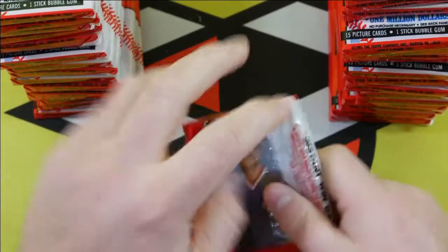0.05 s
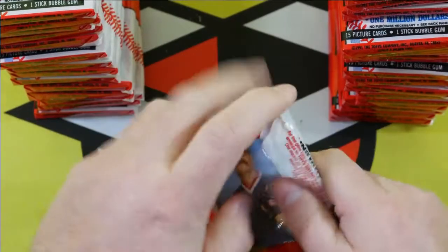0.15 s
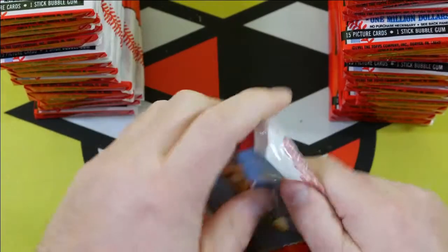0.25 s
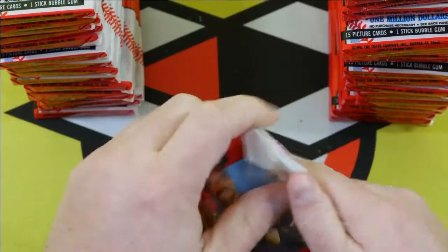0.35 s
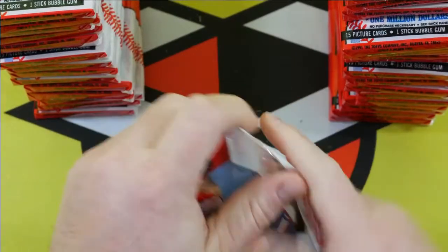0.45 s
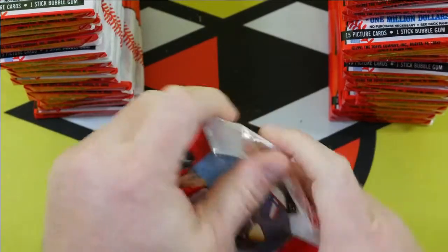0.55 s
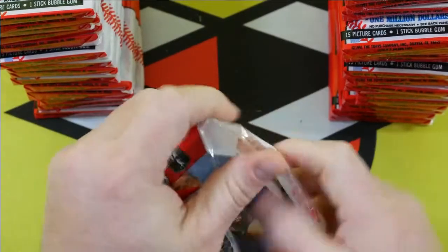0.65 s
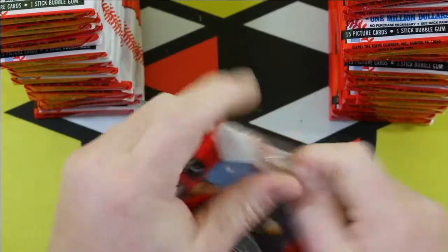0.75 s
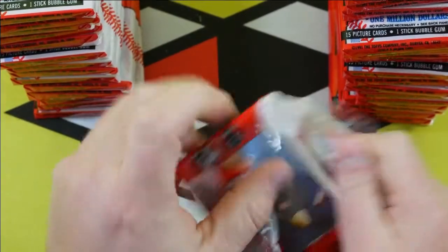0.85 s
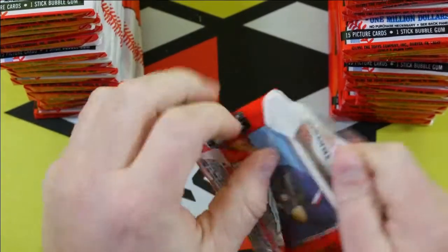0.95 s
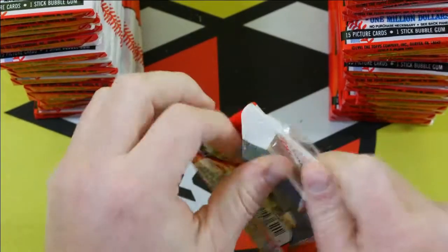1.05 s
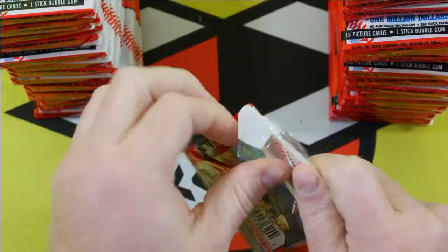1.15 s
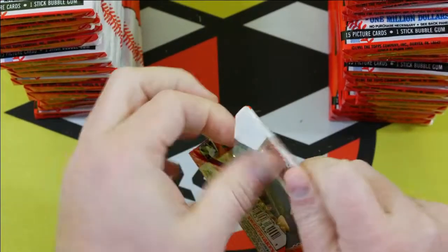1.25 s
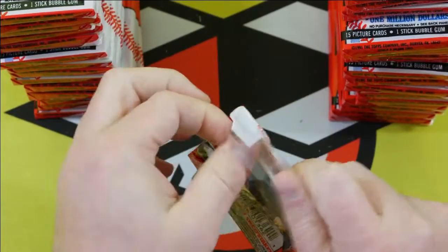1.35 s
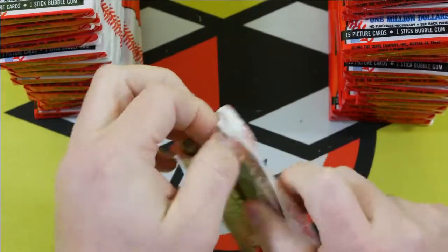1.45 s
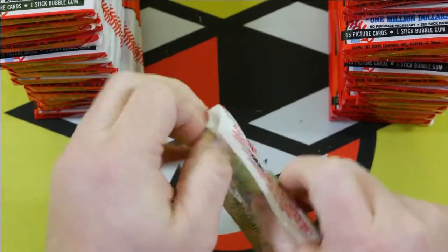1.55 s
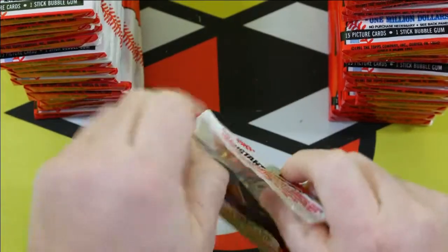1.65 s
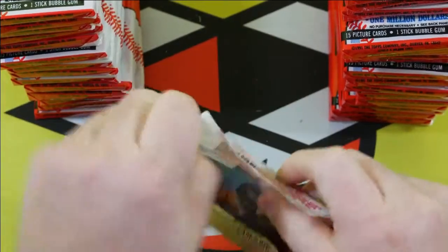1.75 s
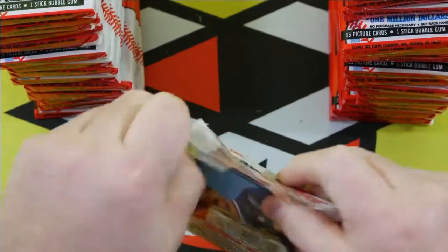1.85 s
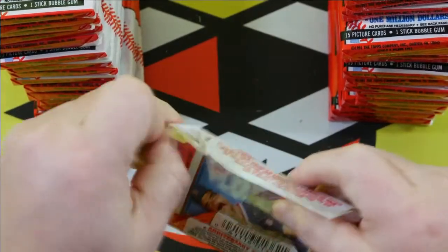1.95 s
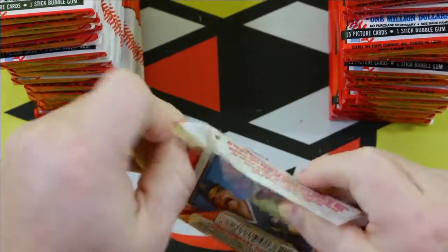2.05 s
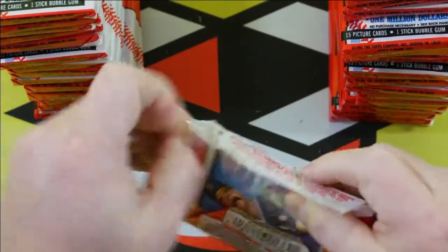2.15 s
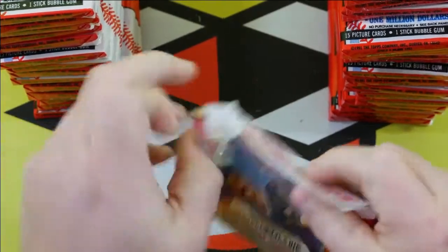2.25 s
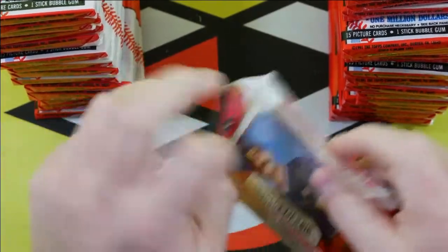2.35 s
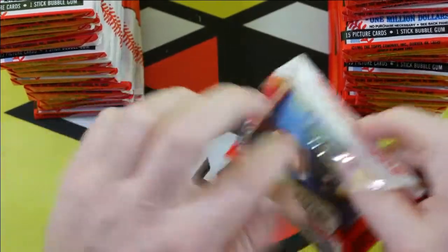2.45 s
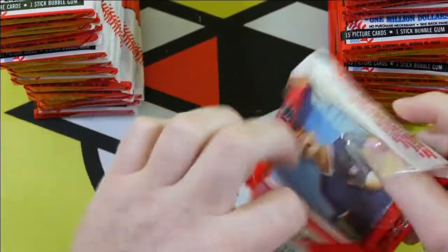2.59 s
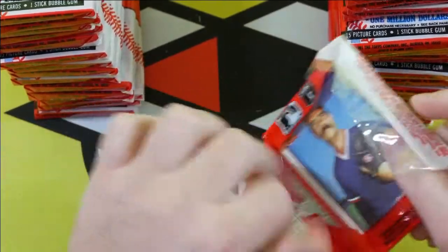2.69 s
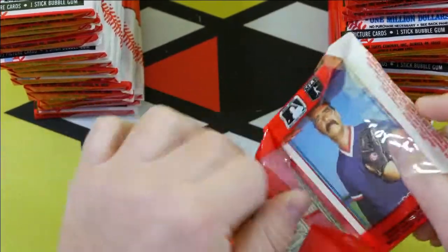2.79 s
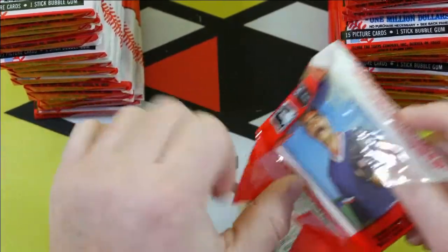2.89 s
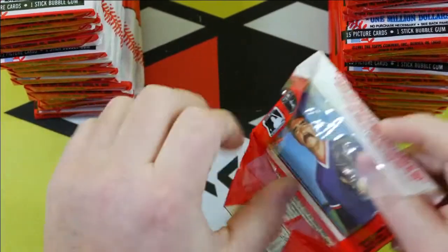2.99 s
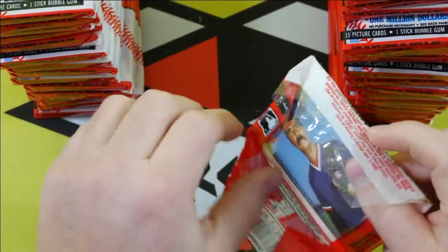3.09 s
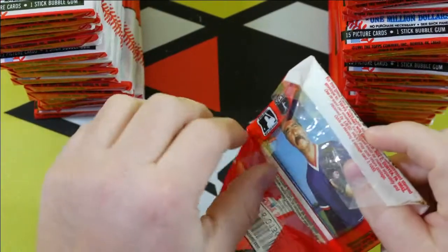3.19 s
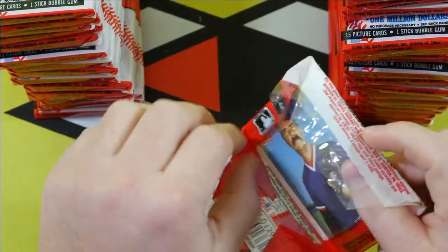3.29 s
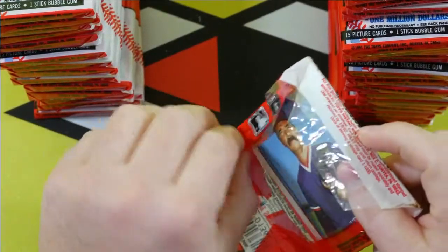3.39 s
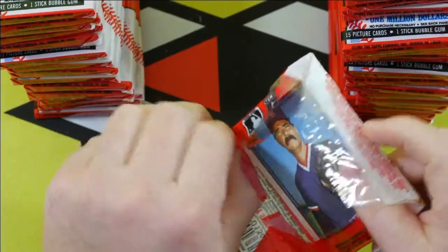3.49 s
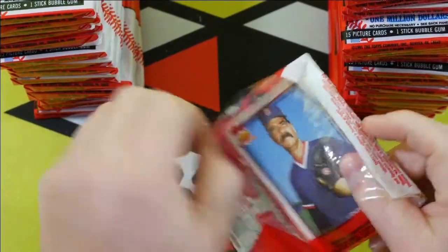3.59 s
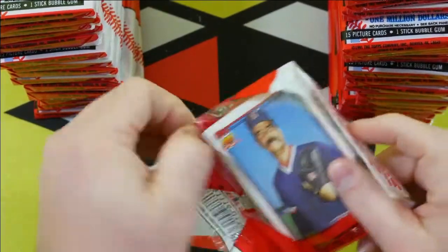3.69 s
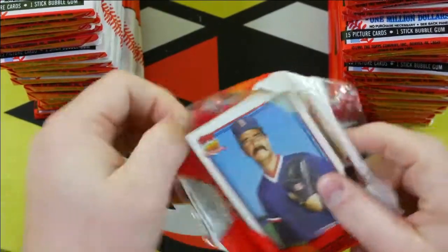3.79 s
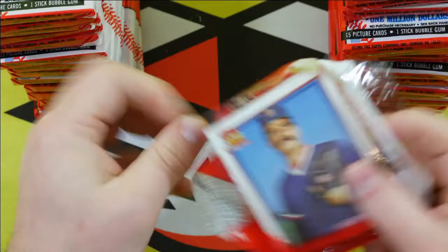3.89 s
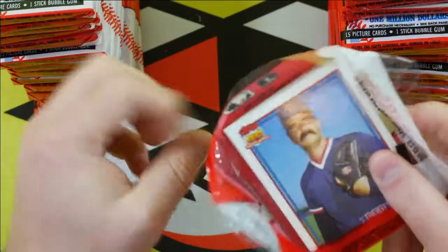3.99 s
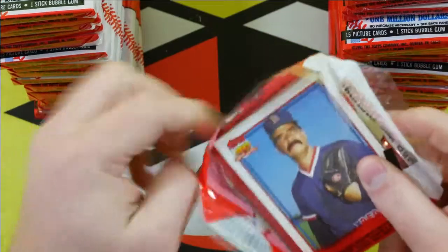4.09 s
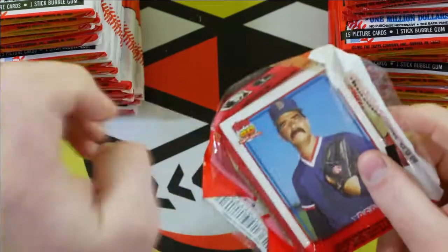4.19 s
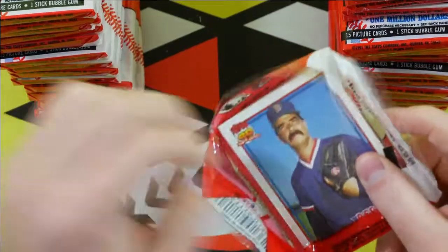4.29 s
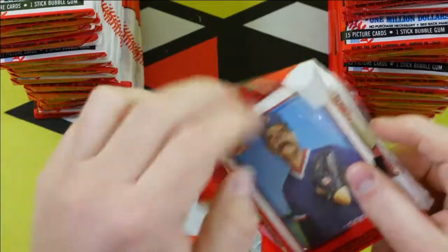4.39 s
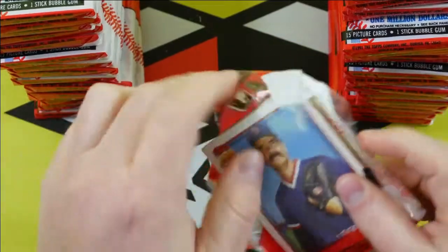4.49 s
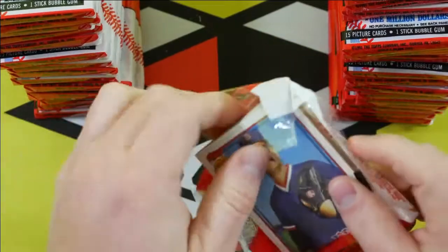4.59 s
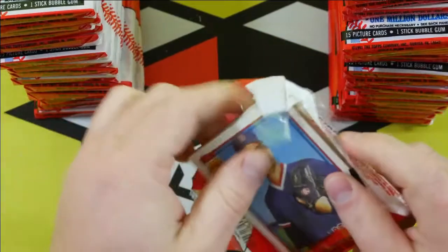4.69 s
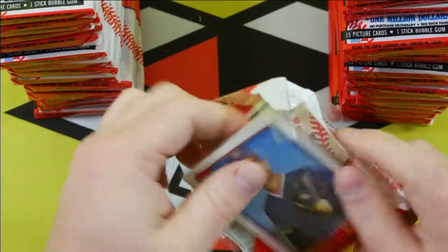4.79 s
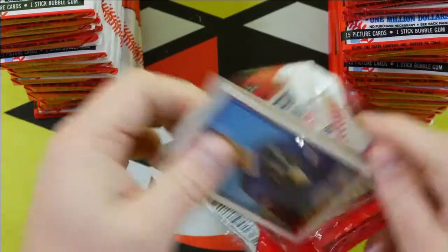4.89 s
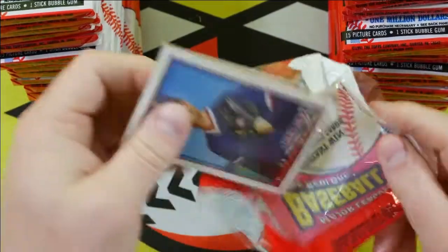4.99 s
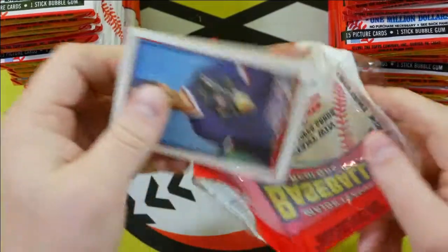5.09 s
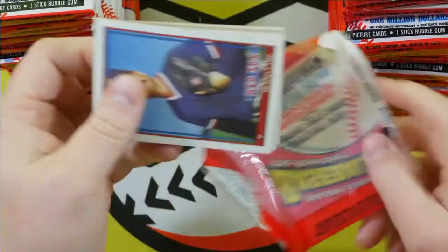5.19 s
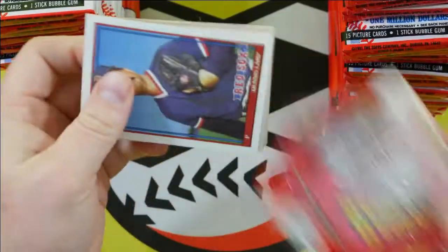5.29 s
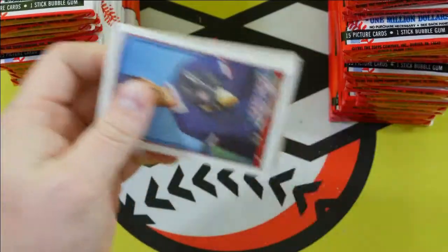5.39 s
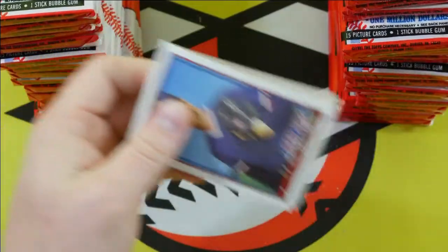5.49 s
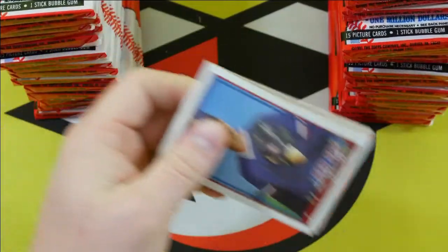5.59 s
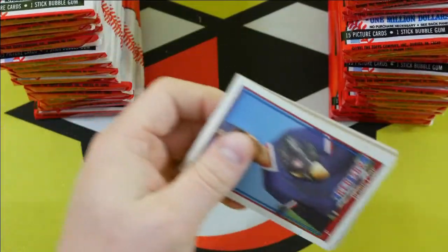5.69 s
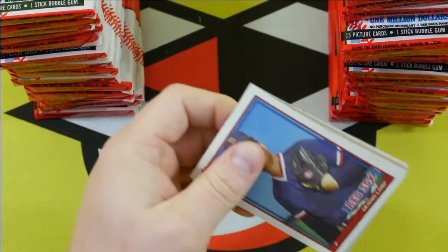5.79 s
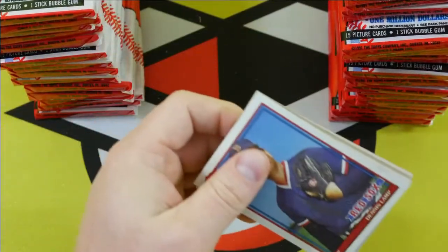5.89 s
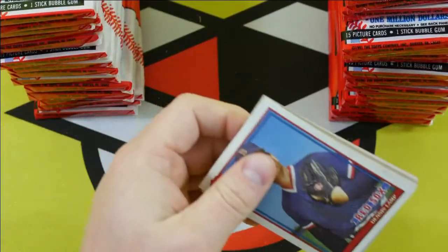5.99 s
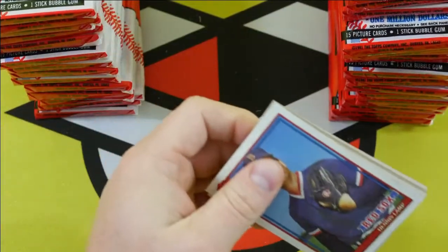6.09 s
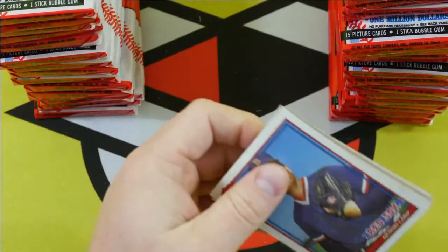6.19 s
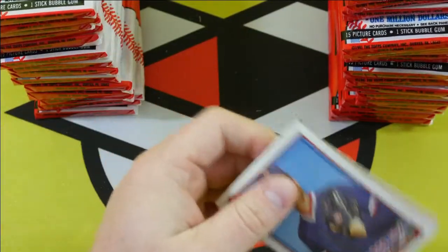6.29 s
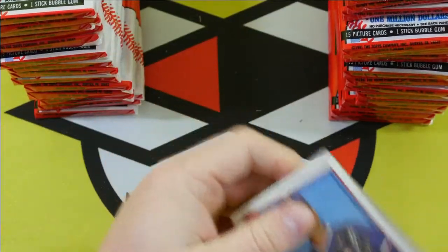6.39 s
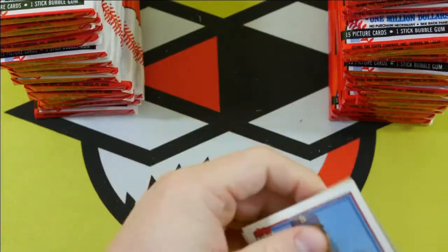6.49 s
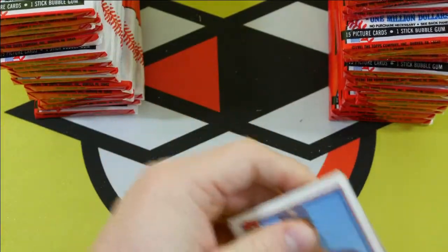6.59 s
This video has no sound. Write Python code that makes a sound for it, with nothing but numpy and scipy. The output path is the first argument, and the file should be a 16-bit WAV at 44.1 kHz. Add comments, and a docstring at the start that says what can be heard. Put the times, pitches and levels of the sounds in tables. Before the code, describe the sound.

Hands pull open a waxy paper card pack close to the microphone in a small room. The stiff wrapper crinkles densely, with sharp little snaps and a few short rips. After a brief lull the crinkling returns, joined by soft, dull bumps and rustles from the stack of cards inside. It then thins out to a few ticks and faint card slides, over a low rumble.

```python
"""Opening a wax-paper card pack

Two hands tear open the pack close above a desk, peel the wrapper back and slide the cards out.
The stiff paper buckles in sharp snaps over a dense crinkle; the stack inside rustles and bumps dully.
Nearby surfaces echo each snap, a small room rings briefly, and a low rumble lies under everything."""
import sys
import numpy as np
from scipy import signal
from scipy.fft import rfft, irfft, next_fast_len
from scipy.io import wavfile
from scipy.ndimage import uniform_filter1d

SR = 44100
rng = np.random.default_rng(int(sys.argv[2]) if len(sys.argv) > 2 else 0)


def generate_wav(signal):
    """Clip the signal to [-1, 1] and save it as 16-bit WAV at the path in sys.argv[1]."""
    frames = np.transpose(np.atleast_2d(signal))
    scaled = np.clip(frames, -1, 1) * 32767
    pcm = np.round(scaled).astype(np.int16)
    wavfile.write(sys.argv[1], SR, pcm)


N = 293265


def amp(db):
    """Decibels to gain."""
    return 10 ** (np.asarray(db) / 20)


def unit(x):
    """Scale to rms 1."""
    return x / np.sqrt(np.mean(x ** 2) + 1e-20)


def along(points, hz):
    """Read a curve of (frequency, value) points on a log frequency axis."""
    freqs, values = np.transpose(points)
    return np.interp(np.log(hz + 1), np.log(freqs + 1), values)


def add(track, start_s, sound):
    """Mix a sound into a track."""
    slot = track[max(round(start_s * SR), 0):][:len(sound)]
    slot += sound[:len(slot)]


def coloured(x, gain_db):
    """Minimum-phase EQ following gain_db(hz): nothing rings ahead of a transient."""
    size = 2 * next_fast_len(len(x) // 2 + 2048)
    hz = np.fft.rfftfreq(size, 1 / SR)
    cepstrum = irfft(np.log(amp(gain_db(hz))), size)
    cepstrum[1:size // 2] *= 2
    cepstrum[size // 2 + 1:] = 0
    return irfft(rfft(x, size) * np.exp(rfft(cepstrum)), size)[:len(x)]


def shaped(x, eq):
    """A signal through an EQ curve, at rms 1."""
    return unit(coloured(x, lambda hz: along(eq, hz)))


def resonance(hz, centre_hz, q):
    """Gain in dB of one damped resonance, such as a patch of paper or card."""
    detune = (hz + 1) / centre_hz - centre_hz / (hz + 1)
    return -10 * np.log10(1 + (q * detune) ** 2)


def gestures(rows, attack_s, release_s):
    """Attack-hold-release power envelopes, one per level column; attack and release each span 20 dB."""
    t = np.arange(N) / SR
    power = np.zeros((len(rows[0][2:]), N))
    for start, hold, *levels_db in rows:
        span = slice(*np.searchsorted(t, [start - 3 * attack_s, start + hold + 3 * release_s]))
        before = np.maximum(start - t[span], 0) / attack_s
        after = np.maximum(t[span] - start - hold, 0) / release_s
        power[:, span] += np.outer(amp(levels_db), amp(-20 * (before + after))) ** 2
    return power


# Swells of handling rumble: (time [s], hold [s], level [dB])
RUMBLE_SWELLS = [(0, 5.2, -49), (.72, 0.25, -48.5), (1.87, 0.31, -39), (3.72, 0.32, -43)]
# Sub-heavy tone of the rumble: (frequency [Hz], gain [dB])
RUMBLE_EQ = [(8, -6), (22, 0), (36, -13.5), (54, -12.5), (90, -25), (300, -53)]


def handling_rumble(floor_db=-55):
    """A low bed that swells with the larger hand movements."""
    power = amp(floor_db) ** 2 + gestures(RUMBLE_SWELLS, attack_s=0.27, release_s=0.57)[0]
    return np.sqrt(power) * shaped(rng.standard_normal(N), RUMBLE_EQ)


# Dark tone of the air: (frequency [Hz], gain [dB])
AIR_EQ = [(20, 30), (90, 6), (130, 11), (550, 3), (16000, -41)]


def air(level_db=-64):
    """Faint, steady room tone."""
    return amp(level_db) * shaped(rng.standard_normal(N), AIR_EQ)


# Light, rustling grip between tugs: (time [s], hold [s], paper level [dB], stack level [dB])
FINGER_HOLDS = [(0, 1.08, -54, -57.5), (1.31, 1.49, -57, -56), (2.9, 0.34, -66.5, -75),
                (3.53, .45, -53, -50.5), (4.35, .72, -56, -54.5), (5.45, .43, -65, -62)]
# Tugs on the wrapper: (time [s], hold [s], paper level [dB], stack level [dB])
FINGER_TUGS = [(.08, 0.41, -48.5, -54), (.765, 0.013, -35, -44), (1.395, 0.11, -48, -50),
               (1.58, 0.053, -44, -46.5), (1.77, 0.063, -46, -54), (1.926, .04, -33.5, -39),
               (2.41, 0.042, -42, -48.5), (2.52, 0.073, -40, -49.5), (2.65, 0.033, -35, -40.5),
               (2.72, 0.069, -41.5, -52.5), (3.24, .12, -48.5, -68), (3.315, 0.0093, -50, -50),
               (3.575, .19, -44, -44), (3.63, 0.03, -34, -47), (3.82, 0.033, -49.5, -46.5),
               (3.96, 0.033, -44, -43.5), (4.385, 0.14, -50, -50), (4.547, 0.047, -41.5, -46),
               (4.8, 0.089, -46, -49), (4.945, 0.047, -43, -47), (5.13, 0.14, -57, -59)]


def hands(rest_db=-72):
    """Fingers tug on top of a light grip: dB envelopes that drive the paper and the card stack."""
    holds = gestures(FINGER_HOLDS, attack_s=0.04, release_s=0.216)
    tugs = gestures(FINGER_TUGS, attack_s=0.0186, release_s=0.055)
    return 10 * np.log10(holds + tugs + amp(rest_db) ** 2)


def buckles(per_second, q=1.2, centre_hz=6500, pitch_scatter=0.71, spread_db=5, flutter_s=0.001):
    """Paper gives in tiny buckles at random moments, each a grain of its own size and pitch."""
    onsets = np.flatnonzero(rng.random(N) < per_second / SR)
    size, pitch = np.clip(rng.standard_normal((2, len(onsets), 1)), -2, 1.2)
    t = np.arange(256) / SR
    flips = rng.standard_normal((len(onsets), len(t))) / (1 + (t / flutter_s) ** 3)
    grain_hz = centre_hz * np.exp(pitch_scatter * pitch)
    ratio = (np.fft.rfftfreq(len(t), 1 / SR) + 1) / grain_hz
    grains = irfft(rfft(flips) / (1 + 1j * q * (ratio - 1 / ratio)))
    grains *= amp(spread_db * size) / np.linalg.norm(grains, axis=1, keepdims=True)
    grains /= np.sqrt(per_second[onsets, None])  # the denser the grains, the smaller each one
    positions = onsets[:, None] + np.arange(len(t))
    return unit(np.bincount(positions.ravel(), grains.ravel(), N)[:N])


# Dull body of the card stack: (frequency [Hz], bandwidth [Hz], gain [dB])
STACK_MODES = [(115, 82, 5.5), (248, 102, -2), (314, 44, -4.5), (602, 54, 2), (777, 77, 0.5),
               (1340, 690, -4.5), (2380, 2400, -3.5)]


def stack_body(hz):
    """Gain in dB of the hand-held stack, whose damped resonances add in power."""
    power = sum(amp(db + resonance(hz, centre, centre / width)) ** 2 for centre, width, db in STACK_MODES)
    return 10 * np.log10(power)


# Bright tone of the crinkle: (frequency [Hz], gain [dB])
CRINKLE_EQ = [(200, -11.5), (900, 0), (2000, -1.5), (4000, 1.5), (7000, 3.5), (13000, -1), (16000, -14.5)]


def wrapper(paper_db, stack_db, yield_db=-60, slips_per_s=45, slip_decay_s=0.008, trim_db=-1.5):
    """The paper crinkles, faster under more effort, and shakes the rubbed stack of cards."""
    buckles_per_s = np.minimum(190 * amp(0.8 * (paper_db + 42.5)), SR / 10)
    crackle = buckles(buckles_per_s)
    # a fold gives way in little avalanches that start at once and die away
    slips = (rng.random(N) < slips_per_s / SR) * rng.uniform(0.4, 1, N)
    avalanches = signal.lfilter([1], [1, -np.exp(-1 / (slip_decay_s * SR))], slips)
    surge = unit(0.2 + avalanches) ** 0.45
    # under a light touch the paper only slides and hisses; past its yield point it buckles
    buckling = 1 / (1 + amp(yield_db - paper_db))
    hiss = np.sqrt(1 - buckling) * rng.standard_normal(N)
    crinkle = shaped(np.sqrt(buckling) * surge * crackle + hiss, CRINKLE_EQ)
    shaking = (surge * buckling * crackle + np.sqrt(surge)) * rng.standard_normal(N)
    rustle = unit(coloured(shaking, stack_body))
    return amp(trim_db) * (amp(paper_db) * crinkle + amp(stack_db) * rustle)


# Fingers and paper knock the stack: (time [s], level before trim [dB], contact pitch [Hz])
STACK_BUMPS = [(0.026, -51, 330), (.447, -46.5, 660), (.765, -34, 625), (1.076, -45, 700),
               (1.921, -41.5, 567.5), (2.665, -36, 690), (2.785, -44, 350.3), (3.627, -38.5, 585),
               (3.778, -46, 130.1), (3.853, -48, 220), (3.975, -41.5, 153), (4.074, -42, 198.3),
               (4.474, -39.5, 227), (4.548, -36, 226), (4.593, -37.5, 147), (4.702, -43, 225),
               (4.755, -41.5, 178.9), (4.824, -42.5, 221), (5.281, -47.5, 242), (5.885, -53, 232)]


def bumps(push=12, settle_s=0.0098, q=2, trim_db=-1):
    """A knock pushes the stack and its loose cards settle; soft contacts favour the low resonances."""
    out, t = np.zeros(N), np.arange(SR // 8) / SR
    for start, db, contact_hz in STACK_BUMPS:
        force = rng.standard_normal(len(t)) * np.exp(-t / settle_s)
        force[0] += push
        knock = coloured(force, lambda hz: stack_body(hz) + resonance(hz, contact_hz, q))
        knock /= np.sqrt(np.sum(knock ** 2) / (0.01 * SR))  # energy of 10 ms at rms 1
        add(out, start, amp(db + trim_db) * knock)
    return out


# The loudest creases snapping through: (time [s], level before trim [dB], facet pitch [Hz])
CREASE_SNAPS = [(0.1029, -30, 5300), (0.1791, -26.5, 6430), (.1946, -28, 5520), (0.2539, -30.5, 8510),
                (0.2752, -28.5, 5600), (0.328, -31, 6300), (0.4055, -29.5, 5673), (0.4491, -31.5, 8320),
                (.4815, -39, 8790), (0.6648, -30.5, 7470), (0.6791, -33, 8020), (0.6953, -33, 6300),
                (0.7298, -31.7, 6900), (0.7594, -30.5, 7580), (0.7668, -20, 6530), (0.7805, -28, 6420),
                (0.801, -35, 11000), (.8502, -30, 6800), (.8867, -32, 5300), (.9761, -36, 4514),
                (0.987, -28.5, 5550), (1.0752, -25.5, 8100), (1.2576, -36.5, 4860), (1.3195, -30.5, 3840),
                (1.3643, -32, 6040), (1.402, -37.5, 5400), (1.4675, -33, 6500), (1.4877, -32, 4790),
                (1.4984, -30, 6704), (1.602, -36, 6317), (1.6419, -28.5, 6700), (1.7271, -29.5, 6650),
                (1.7485, -27.5, 5007), (1.7813, -29, 5740), (1.798, -27, 5870), (1.8452, -39, 7516),
                (1.882, -31, 5330), (1.9231, -21, 5954), (1.9394, -26, 6400), (1.9604, -35, 6255),
                (2.0364, -31, 9010), (2.0956, -31, 3910), (2.1975, -28.5, 7800), (2.3307, -24.5, 6600),
                (2.4278, -32.5, 7160), (2.4454, -29, 5360), (2.5164, -30, 13500), (2.535, -40, 6900),
                (2.5555, -32, 5753), (2.5855, -37.5, 5300), (2.645, -34, 4213), (2.663, -24.5, 4050),
                (2.7269, -33.5, 4740), (2.7892, -35.5, 5730), (2.935, -48, 5085), (2.9923, -36.5, 6450),
                (3.2164, -24.5, 9567), (3.319, -40, 5003), (3.41, -44.5, 7300), (3.5182, -36.5, 4040),
                (3.5677, -28.5, 9736), (3.6251, -23, 4900), (3.647, -29, 6088), (3.6559, -22.5, 7470),
                (3.6683, -24.5, 5300), (3.724, -33, 6600), (3.738, -29, 8400), (3.7796, -35, 5900),
                (3.8493, -29, 7800), (3.98, -31.5, 4300), (3.9874, -30, 5457), (4.0062, -34, 3580),
                (4.0803, -33, 4860), (4.182, -45.5, 5000), (4.322, -43, 3870), (4.349, -38.5, 7760),
                (4.3833, -38, 6230), (4.4488, -38, 6500), (4.4745, -29.5, 7100), (4.5448, -32.5, 3645),
                (4.7051, -33, 6000), (4.7905, -35, 5487), (4.825, -32.5, 4300), (4.89, -32, 6803),
                (4.9684, -33, 5408), (5.082, -42.5, 7000), (5.128, -39.5, 7030), (5.1432, -37.5, 5900),
                (5.182, -42, 4313), (5.2033, -38.5, 6790), (5.2477, -30, 6100), (5.321, -40.5, 4734),
                (5.492, -26.5, 8300), (5.676, -47.5, 5010), (5.7291, -42.5, 4490)]
# Thin, crisp tone of a snap: (frequency [Hz], gain [dB])
SNAP_EQ = [(100, -22), (1500, 2), (3500, 0.5), (13000, -1.5), (16000, -5)]


def snaps(tick=2.6, flutter_s=0.0015, q=0.91, neighbour_db=-5, trim_db=-0.06):
    """Each crease flips with a tick and a brief flutter, ringing its own paper facet and a neighbour."""
    out, t = np.zeros(N), np.arange(SR // 40) / SR
    for start, db, facet_hz in CREASE_SNAPS:
        flip = rng.choice([-1, 1], len(t)) / (1 + (t / flutter_s) ** 2)
        flip[0] += tick
        neighbour_hz = facet_hz * np.exp(0.45 * rng.standard_normal())

        def ring_db(hz):
            facet = amp(resonance(hz, facet_hz, q))
            neighbour = amp(neighbour_db + resonance(hz, neighbour_hz, 2 * q))
            return 10 * np.log10(facet ** 2 + neighbour ** 2)

        snap = coloured(flip, lambda hz: along(SNAP_EQ, hz) + ring_db(hz))
        snap /= np.sqrt(np.sum(snap ** 2) / (0.002 * SR))  # energy of 2 ms at rms 1
        add(out, start, amp(db + trim_db) * snap)
    return out


# Tears and slides: (time [s], attack [s], 20 dB decay [s], level before trim [dB], rasp pitch [Hz])
RASPS = [(1.981, 0.032, 0.19, -47, 2100), (2.525, 0.019, .13, -43, 2796), (2.655, .0051, 0.44, -49.5, 795),
         (3.825, 0.02, .16, -44.5, 2720), (3.95, 0.017, 0.13, -39.5, 2504),
         (4.544, 0.0051, 0.057, -32, 2120), (5.76, .0049, 0.071, -59, 1870), (5.861, 0.035, 0.06, -60, 970),
         (6.228, 0.015, 0.086, -52.5, 1600), (6.247, .021, 0.095, -53.5, 4710)]
# Tone of the swish: (frequency [Hz], gain [dB])
RASP_EQ = [(100, 13), (1000, -12), (2400, -8.5), (3400, -11), (7000, -7.5), (16000, -5)]


def rasps(q=2.6, graininess=0.38, trim_db=-0.5):
    """The wrapper tears and cards slide, each a grainy swish that swells and dies away."""
    out, t = np.zeros(N), np.arange(SR // 3) / SR
    for start, attack, decay, db, rasp_hz in RASPS:
        roughness = unit(uniform_filter1d(rng.standard_normal(len(t)), size=90))
        grit = np.exp(graininess * roughness) * rng.standard_normal(len(t))
        swish = coloured(grit, lambda hz: along(RASP_EQ, hz) + resonance(hz, rasp_hz, q))
        envelope = np.minimum(t / attack, 1) * amp(-20 * np.maximum(t - attack, 0) / decay)
        add(out, start, amp(db + trim_db) * envelope * unit(swish))
    return out


# Early reflections off nearby surfaces: (delay [s], level [dB])
REFLECTIONS = [(.0078, -7.5), (.016, -15)]
# Reverb time of the small room: (frequency [Hz], 60 dB decay [s])
ROOM_DECAY = [(150, 0.26), (1000, 0.33), (5000, 0.21), (10000, 0.17), (16000, 0.01)]


def room(x, tail_db=-8, smear_s=0.0009):
    """Scattered echoes and a short tail, redrawn every 20 ms so the room sounds smooth and toneless."""
    out, hop = x.copy(), SR // 50
    for start in range(0, N - 2 * hop, hop):
        hz, t, noise = signal.stft(rng.standard_normal(SR // 3), SR, nperseg=256)
        decay = amp(-60 * t / along(ROOM_DECAY, hz)[:, None]) * (t > 0)
        response = signal.istft(noise * decay, SR, nperseg=256)[1]
        response *= amp(tail_db) / np.linalg.norm(response)
        for delay, db in REFLECTIONS:
            echo = rng.standard_normal(hop) * np.exp(-np.arange(hop) / (smear_s * SR))
            add(response, delay, amp(db) * echo / np.linalg.norm(echo))
        piece = x[start:start + 2 * hop] * np.sqrt(np.hanning(2 * hop))
        add(out, start / SR, signal.fftconvolve(piece, response))
    return out


def scene():
    """Wrapper and cards in the room, over a bed of rumble and air, in mono."""
    pack = snaps() + wrapper(*hands()) + bumps() + rasps()
    return (room(pack) + handling_rumble() + air())[None]


def record(dry, cutoff_hz=16100):
    """A brick-wall low-pass takes off the very top."""
    size = next_fast_len(N + SR // 4)
    hz = np.fft.rfftfreq(size, 1 / SR)
    return irfft(rfft(dry, size) / (1 + (hz / cutoff_hz) ** 120), size)[..., :N]


dry = scene()
out = record(dry)
generate_wav(out)
```